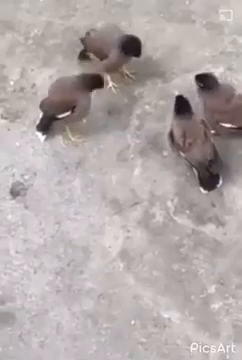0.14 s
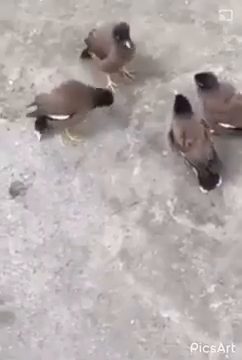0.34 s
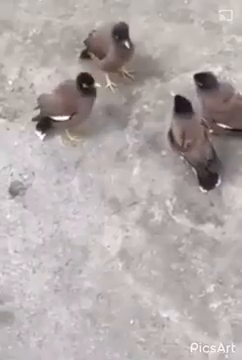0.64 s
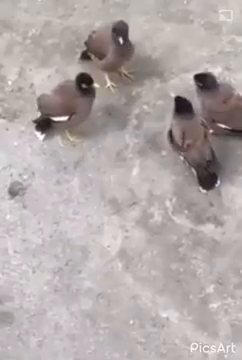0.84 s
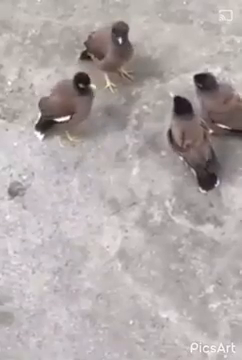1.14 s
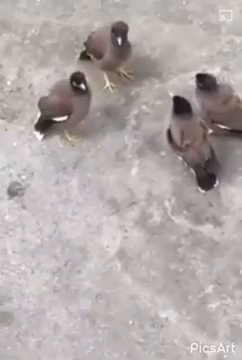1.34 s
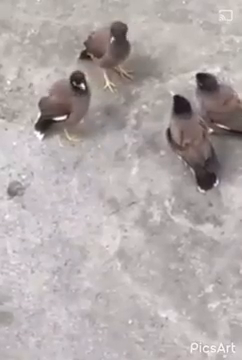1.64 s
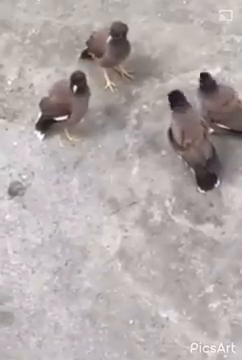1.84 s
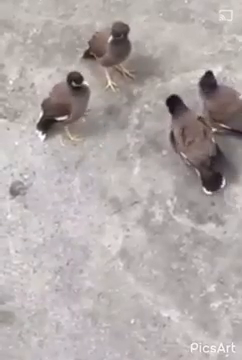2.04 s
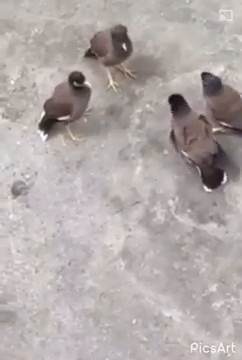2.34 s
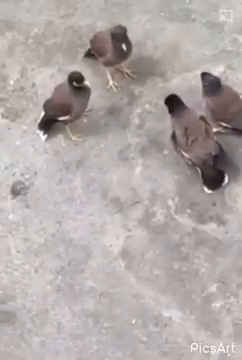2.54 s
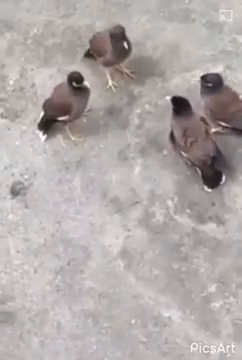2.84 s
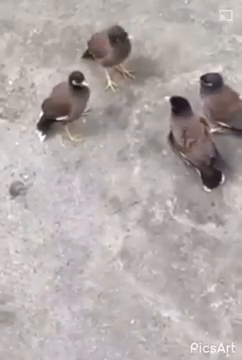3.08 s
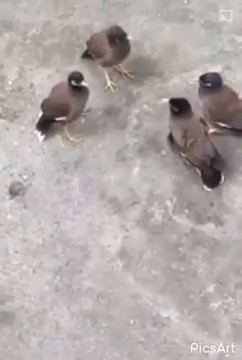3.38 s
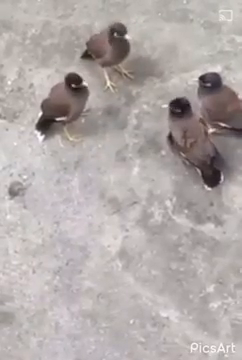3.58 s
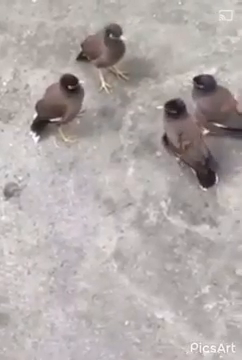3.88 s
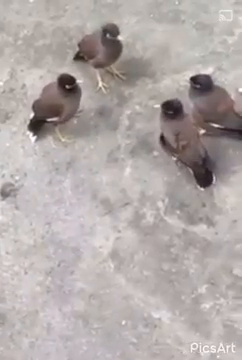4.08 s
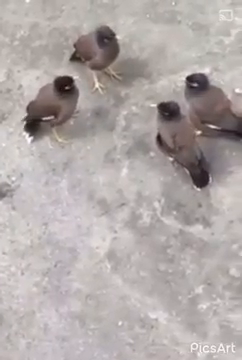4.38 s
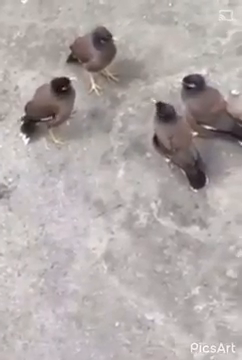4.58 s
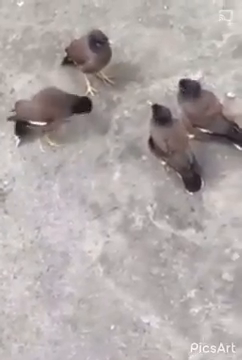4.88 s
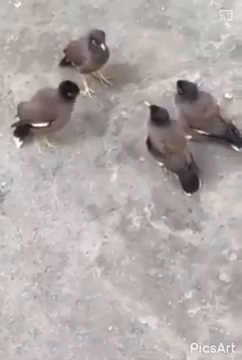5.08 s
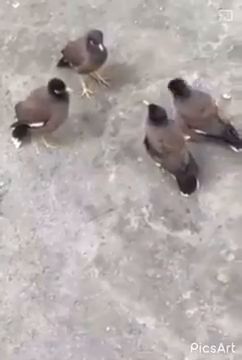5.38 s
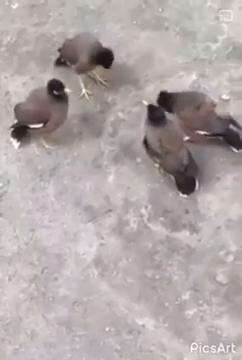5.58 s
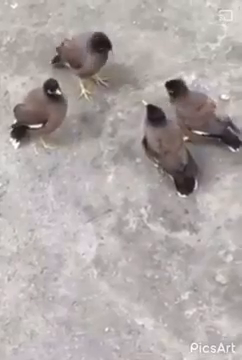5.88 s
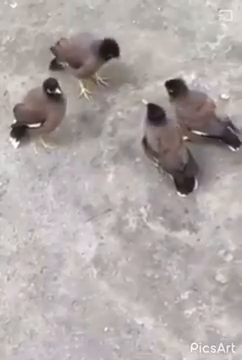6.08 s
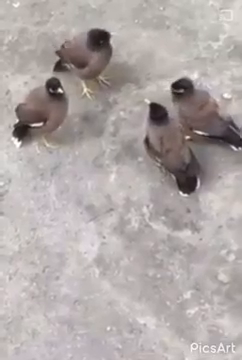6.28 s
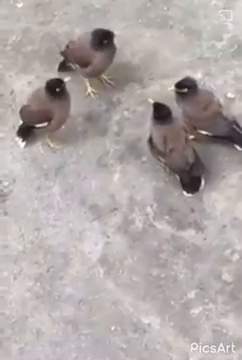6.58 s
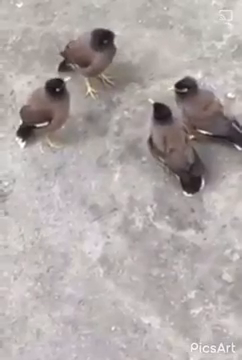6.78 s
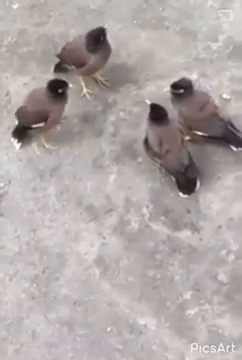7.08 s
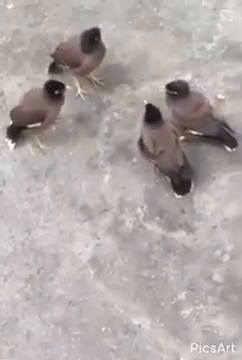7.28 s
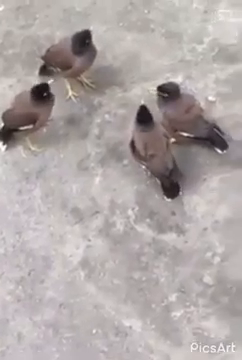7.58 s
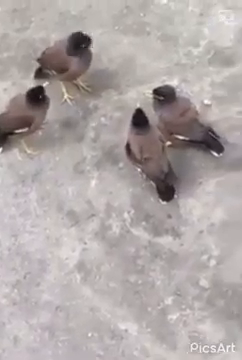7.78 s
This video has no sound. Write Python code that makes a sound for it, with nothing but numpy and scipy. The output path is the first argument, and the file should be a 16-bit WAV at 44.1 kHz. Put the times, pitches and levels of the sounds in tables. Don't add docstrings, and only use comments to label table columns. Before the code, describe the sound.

After a tiny silence, a harsh bright myna rasp with a beak tick bursts in at 0.1 s over faint traffic rumble and low wind buffeting. Softer mutters and low churrs follow until a thin high flute note at 1.15 s. From 1.3 to 3.2 s near scolds come about every quarter second, opened by falling chirps and mixed with arched whistles and quick slides, strongest around 2.5-3 s. Hooked cries fall at 3.2 s; a very high, sharp squeal and rasp strike at 3.4-3.6 s. Mutters and churrs fill the lull to 4.5 s. Three rapid beak ticks at 4.6 s lead to scolds and nasal pips until 5.6 s, wind thumping underneath. Low mellow flute notes run from 5.2 to 7 s, with clear drooping whistles at 6.1-7.1 s. Two pips with rasps, at 7.3 and 7.6 s, close it. Close, mono, short hard-yard echoes, dull above 8 kHz.

```python
import sys
import numpy as np
from scipy import signal
from scipy.fft import rfft, irfft, dct
from scipy.io import wavfile
from scipy.ndimage import uniform_filter1d

SR = 44100
rng = np.random.default_rng(int(sys.argv[2]) if len(sys.argv) > 2 else 0)


def elevation(decibels):
    levels = np.asarray(decibels, float)
    return 10 ** (levels / 20)


def master(y):
    cut = np.clip(np.atleast_2d(y).T, -1, 1)
    pcm = np.round(cut * 32767)
    wavfile.write(sys.argv[1], SR, pcm.astype(np.int16))


N = 349713

# [f/Hz, level/dB per Hz]
TOWN_SPECTRUM = [(12, -27.5), (20, 0.5), (206, -4), (455, -11), (867, -15.5), (958, -17), (1500, -16.5),
                 (1920, -16), (2400, -17.5), (3070, -26.5), (3560, -30.5), (6150, -19), (7900, -29),
                 (9750, -74.5), (16500, -120)]
TOWN_DB, HUM_HZ, HUM_DB = -36.5, 866, -56.5
# [t/s, level/dB]
WIND_GUSTS = [(0.1, -44.5), (0.27, -35.5), (0.84, -50), (0.97, -37.5), (3.39, -47), (3.59, -35.5),
              (4.39, -50), (4.57, -28.5), (4.74, -59.5), (5.03, -27), (5.18, -50), (5.33, -38.5),
              (5.86, -44.5), (6.29, -35), (6.58, -48.5), (7.73, -49), (7.82, -30), (7.93, -56)]

# [crest t/s, hold t/s, beak level/dB, chest level/dB]
NEAR_SCOLDS = [(0.1, 0.11, -19, -32.5), (1.325, 0.018, -21, -28), (1.5, 0.074, -22, -27.5),
               (1.755, 0.051, -24, -26), (1.98, 0.043, -23, -26), (2.275, 0.0038, -20.5, -23.5),
               (2.505, .02, -20, -23.5), (2.735, 0.029, -17.5, -21.5), (2.97, 0.029, -12, -21.5),
               (3.17, 0.013, -21, -22), (3.49, 0.088, -21, -32), (4.62, 0.024, -30.5, -43.5),
               (4.83, 0.059, -25.5, -34.5), (5.175, 0.01, -17.5, -29), (5.39, 0.017, -20.5, -26.5),
               (5.625, 0.015, -22, -34.5), (7.33, 0.0085, -25, -25.5), (7.58, 0.055, -29.5, -32)]
SCOLD_RISE_DB_S, SCOLD_BEAK_FALL_DB_S, SCOLD_CHEST_FALL_DB_S = 420, 155.5, 119
# [crest t/s, hold t/s, beak level/dB, chest level/dB]
FAR_MUTTERS = [(0.46, 0.0065, -41, -41), (0.66, 0.012, -31, -39.5), (0.92, 0.0067, -31, -38.5),
               (1.16, 0.053, -30.5, -31.5), (2.06, 0.027, -28, -36), (2.58, 0.014, -27, -26.5),
               (3.08, .04, -26.5, -27), (3.4, 0.03, -39.5, -34), (3.76, .02, -33, -31),
               (3.88, 0.023, -43.5, -35.5), (4.09, 0.1, -36, -37), (4.42, 0.014, -36.5, -34.5),
               (5.08, 0.027, -36.5, -35), (5.3, 0.06, -29.5, -38.5), (6.08, 0.035, -32.5, -44.5),
               (6.27, 0.05, -30.5, -42), (6.56, 0.18, -32, -35), (6.8, 0.042, -35, -33.5),
               (7.07, 0.04, -28, -29.5), (7.42, 0.017, -33, -39.5), (7.68, 0.071, -36.5, -38)]
MUTTER_RISE_DB_S, MUTTER_BEAK_FALL_DB_S, MUTTER_CHEST_FALL_DB_S = 159.5, 133, 133
# [crest t/s, hold t/s, level/dB]
LOW_CHURRS = [(0.216, 0.016, -29.5), (0.461, 0.017, -31), (0.654, 0.027, -27.5), (0.922, .03, -27),
              (1.124, 0.042, -29.5), (1.305, .01, -26.5), (1.527, .03, -35.5), (1.867, 0.018, -49),
              (2.013, 0.0092, -40.5), (2.539, 0.024, -32), (2.976, .02, -37.5), (3.088, 0.022, -31.5),
              (3.222, 0.014, -32), (3.414, .02, -30.5), (3.758, .06, -30.5), (4.068, .04, -30.5),
              (4.284, 0.036, -35.5), (4.421, 0.018, -28), (4.614, 0.01, -31.5), (5.087, 0.022, -36),
              (5.19, .01, -33), (5.365, 0.17, -32.5), (5.92, 0.033, -34), (6.274, 0.17, -45.5),
              (6.798, .03, -35.5), (7.099, 0.03, -31.5), (7.334, .03, -40), (7.659, 0.073, -37)]
CHURR_RISE_DB_S, CHURR_FALL_DB_S = 188, 189
# [f/Hz, width f/Hz, level/dB]
BEAK_MODES = [(4098, 1500, -8.5), (5000, 1100, -6), (6140, 870, 4), (7860, 1000, 1)]
# [f/Hz, width f/Hz, level/dB]
CHEST_MODES = [(2400, 670, 0.97), (3099, 610, -2.4)]
# [f/Hz, width f/Hz, level/dB]
CHURR_MODES = [(1238, 380, -7), (1635, 380, -4.5)]

# [t/s, peak level/dB]
BEAK_TICKS = [(0.1055, -9), (0.467, -23.5), (1.9483, -15), (2.237, -16.5), (2.4723, -13), (3.4415, -21.5),
              (4.5824, -13), (4.6105, -10.5), (4.6408, -12), (4.815, -18.5), (5.159, -9.5), (5.6084, -12.5),
              (5.904, -22), (5.9491, -17.5), (6.028, -27), (6.0619, -22), (6.2521, -11.5), (6.432, -15.5),
              (7.5193, -38), (7.543, -56)]

# [t/s, length t/s, from f/Hz, to f/Hz, level/dB]
FLUTE_NOTES = [
    (5.19, 0.21, 1327, 1530, -37.5),
    (5.68, .12, 1456, 1420, -39.5),
    (5.85, .1, 1535, 1526, -36.5),
    (6.06, 0.073, 1420, 1469, -37),
    (6.2, .11, 1520, 1490, -37),
    (6.48, .18, 1421, 1502, -39),
    (7.0, 0.065, 1435, 1408, -40),
    (1.15, .15, 2360, 2363, -36.5),
]
# [t/s, length t/s, from f/Hz, to f/Hz, level/dB]
FALLING_CHIRPS = [
    (1.29, 0.057, 2440, 2130, -35),
    (1.515, 0.049, 2290, 1950, -33),
    (1.72, 0.055, 2468, 1760, -23),
    (1.953, 0.052, 2390, 1783, -24.5),
    (2.24, .05, 2500, 1739, -24.5),
    (2.48, .05, 2468, 1800, -20),
    (2.71, 0.044, 2317, 1920, -22),
    (2.96, 0.045, 2280, 1683, -22.5),
]
# [multiple, loudest at share of chirp, level/dB, swell level/dB]
CHIRP_THROAT = [
    (1, 0.054, -6.5, 42.5),
    (2, 0.76, -1.5, 61.5),
    (3, 0.67, -1, 112),
]
# [t/s, length t/s, crest f/Hz, level/dB, closing fall 0-1]
ARCHED_WHISTLES = [
    (1.4, 0.13, 2800, -28, 0.13),
    (2.025, 0.12, 2780, -27, 0.06),
    (2.54, 0.16, 2780, -30, 0),
    (6.1, 0.15, 2752, -29, 0.2),
    (6.495, .17, 2785, -28, 0.13),
    (6.862, 0.17, 2770, -26.5, .17),
    (7.03, 0.11, 2820, -30, 0.09),
]
WHISTLE_OCTAVE_DB, PIP_OCTAVE_DB = -3, -4
# [t/s, length t/s, from f/Hz, to f/Hz, level/dB]
STRAIGHT_SLIDES = [(1.785, 0.042, 2327, 3170, -30.5), (2.02, 0.033, 2356, 3230, -28.5),
                   (2.14, 0.074, 2813, 1996, -32.5), (6.22, .06, 2650, 1974, -37.5),
                   (6.66, 0.092, 2800, 2820, -36), (2.33, 0.063, 3396, 3315, -33.5),
                   (2.54, 0.031, 1948, 1515, -26), (2.7, 0.12, 2660, 1920, -32.5),
                   (2.975, .07, 5000, 4514, -22), (3.04, .08, 3195, 3300, -29.5),
                   (3.1, .09, 3283, 3440, -28), (3.18, 0.087, 3460, 3530, -37),
                   (3.095, 0.043, 2035, 1398, -30), (3.21, 0.037, 1840, 1183, -31),
                   (3.2, .06, 2983, 2008, -31), (3.02, .02, 2710, 3150, -27.5),
                   (3.4, 0.012, 4220, 5840, -50), (3.411, .021, 3960, 6580, -18),
                   (3.49, .05, 6464, 3860, -35.5), (3.57, 0.051, 1860, 1385, -39),
                   (3.62, .035, 6000, 4970, -29), (4.812, 0.019, 6030, 2400, -34.5),
                   (7.145, 0.046, 2930, 2440, -36)]
# [t/s, length t/s, from f/Hz, to f/Hz, level/dB]
CLOSING_HOOKS = [
    (6.27, .12, 2000, 1740, -36),
    (6.67, .11, 2044, 1716, -33),
    (7.05, .09, 1863, 1711, -31),
    (7.23, .07, 2110, 1990, -40.5),
    (3.17, .035, 3430, 2277, -22.5),
    (3.478, .062, 6360, 2840, -24),
]
# [t/s, length t/s, crest f/Hz, level/dB, closing fall 0-1]
NASAL_PIPS = [
    (4.825, 0.049, 3153, -29, 0.031),
    (5.045, .085, 3065, -32.5, 0.15),
    (5.29, .085, 3093, -29.5, .2),
    (7.315, .048, 2993, -26, 0.037),
    (7.57, .045, 3005, -26, 0.016),
]
# [multiple, level/dB]
PIP_STACK = [
    (.5, -10),
    (1.5, -9),
]

# [t/s, level/dB]
NEAR_ECHOES = [
    (0.009, -13),
    (.027, -19),
]
YARD_DB, YARD_T60_S = -10, .45
SHARP_ATTACKS = [.11, 1.96, 2.24, 2.96, 3.43, 3.47, 4.6, 4.82, 5.16, 5.61, 6.25]
START_S, CUTOFF_HZ = .098, 8050


def rms_one(x):
    return x / np.sqrt(np.mean(x ** 2) + 1e-20)


def drift(rate_hz):
    r = np.exp(-2 * np.pi * rate_hz / SR)
    settled = signal.lfilter([1], [1, -2 * r, r * r], rng.standard_normal(N + SR))[SR:]
    return rms_one(settled)


def town():
    t = np.arange(N) / SR
    hz = np.maximum(np.fft.rfftfreq(N, 1 / SR), 1)
    colour_hz, colour_db = np.transpose(TOWN_SPECTRUM)
    colour = elevation(np.interp(np.log(hz), np.log(colour_hz), colour_db))
    far = rms_one(irfft(rfft(rng.standard_normal(N)) * colour, N))
    far = far * elevation(TOWN_DB + 1.1 * drift(5.6))
    hum = elevation(HUM_DB + 1.7 * drift(7.8)) * np.sin(2 * np.pi * HUM_HZ * t)
    gust_band = signal.butter(2, [20, 70], "band", fs=SR, output="sos")
    gusts = rms_one(signal.sosfilt(gust_band, rng.standard_normal(N)))
    wind_s, wind_db = np.transpose(WIND_GUSTS)
    return far + hum + elevation(np.interp(t, wind_s, wind_db) + 0.5) * gusts


def throat(x, modes):
    out = 0
    for k, (hz, width_hz, db) in enumerate(modes):
        r = np.exp(-np.pi * width_hz / SR)
        b = [(1 - r * r) / 2, 0, (r * r - 1) / 2]
        a = [1, -2 * r * np.cos(2 * np.pi * hz / SR), r * r]
        ringing = signal.lfilter(b, a, signal.lfilter(b, a, x))
        out = out + (-1) ** k * elevation(db) * ringing
    return rms_one(out)


def flaps(rate_hz, jitter, spread_db, breath):
    turns = np.cumsum(rate_hz * np.exp(jitter * drift(150)) / SR)
    slap = np.diff(np.floor(turns), prepend=0) * elevation(spread_db * rng.uniform(-1, 1, N))
    puff = rng.standard_normal(N) * (.3 + np.exp(-3.0 * (turns % 1)))
    return rms_one(slap) + breath * rms_one(puff)


def streaks(rate_hz, high_hz, low_hz, fall_s):
    t = np.arange(round(fall_s * SR)) / SR
    glide = signal.chirp(t, high_hz, fall_s, low_hz, method="logarithmic") * np.hanning(len(t))
    return signal.fftconvolve(flaps(rate_hz, jitter=.5, spread_db=6, breath=0), glide)[:N]


def swells(s, hold_s, db, rise_db_s, fall_db_s):
    t = np.arange(0, N, 32) / SR
    s, hold_s, db = s[:, None], hold_s[:, None], db[:, None]
    climb_db = rise_db_s * np.maximum(s - t, 0)
    decay_db = fall_db_s * np.maximum(t - s - hold_s, 0)
    gain = np.sqrt(np.sum(elevation(2 * (db - climb_db - decay_db)), axis=0))
    return np.interp(np.arange(N) / SR, t, gain)


def rasps():
    beak, chest = 0, 0
    for rows, rise, beak_fall, chest_fall in [
            (NEAR_SCOLDS, SCOLD_RISE_DB_S, SCOLD_BEAK_FALL_DB_S, SCOLD_CHEST_FALL_DB_S),
            (FAR_MUTTERS, MUTTER_RISE_DB_S, MUTTER_BEAK_FALL_DB_S, MUTTER_CHEST_FALL_DB_S)]:
        s, hold_s, beak_db, chest_db = np.transpose(rows)
        beak = np.hypot(beak, swells(s, hold_s, beak_db, rise, beak_fall))
        chest = np.hypot(chest, swells(s, hold_s, chest_db, rise, chest_fall))
    harsh = rms_one(flaps(330, jitter=.35, spread_db=7.5, breath=1.2))
    harsh = harsh + elevation(-5) * rms_one(streaks(70, high_hz=7600, low_hz=1900, fall_s=.07))
    low = flaps(190, jitter=.3, spread_db=3.5, breath=.9)
    flutter = elevation(1.6 * drift(40))
    bright = beak * throat(harsh, BEAK_MODES) + chest * throat(harsh, CHEST_MODES)
    churr = swells(*np.transpose(LOW_CHURRS), CHURR_RISE_DB_S, CHURR_FALL_DB_S)
    return elevation(-6.0) * (flutter * bright + churr * throat(low, CHURR_MODES))


def ticks():
    clicks = np.full(N, 1e-18)
    for s, db in BEAK_TICKS:
        clicks[round(s * SR)] = elevation(db - 5.5)
    snap = signal.lfilter([1], [1, -np.exp(-1 / (.002 * SR))], clicks)
    release = signal.lfilter([1], [1, -np.exp(-1 / (0.023 * SR))], clicks)
    burst = snap + elevation(-12.5) * release
    return burst * throat(rng.standard_normal(N), BEAK_MODES + CHEST_MODES) / 2


def sing(notes, wobble, flutter_db, edge_s):
    out = np.zeros(N)
    shake = 1 + wobble * drift(120)
    tremble = elevation(flutter_db * drift(60))
    for rows in notes:
        s, hz, *levels = np.transpose(rows)
        at = np.arange(int(s[0] * SR), int(s[-1] * SR))
        t = at / SR
        phase = 2 * np.pi * np.cumsum(np.interp(t, s, hz) * shake[at]) / SR
        ends = np.clip(np.minimum(t - s[0], s[-1] - t) / edge_s, 0, 1)
        for k, db in enumerate(levels):
            gain = np.sqrt(2) * elevation(np.interp(t, s, db)) * ends * tremble[at]
            out[at] += gain * np.sin((k + 1) * phase)
    return out


def glides(notes, crest, swell_db, haste=0.011, multiple=1, gain_db=0):
    share = np.linspace(0, 1, 24)
    way = (1 - np.exp(-haste * share)) / (1 - np.exp(-haste))
    out = []
    for s, length, from_hz, to_hz, db in notes:
        hz = multiple * from_hz * (to_hz / from_hz) ** way
        level_db = db + gain_db - swell_db * (share - crest) ** 2
        out.append(np.c_[s + length * share, hz, level_db])
    return out


def flutes():
    return sing(glides(FLUTE_NOTES, crest=0.53, swell_db=12), 0.008, 1.7, edge_s=0.0091)


def chirps():
    notes = []
    for multiple, crest, gain_db, swell_db in CHIRP_THROAT:
        notes += glides(FALLING_CHIRPS, crest, swell_db, haste=-1.5, multiple=multiple, gain_db=gain_db)
    return sing(notes, .012, 3.2, edge_s=0.0031)


def arched(notes, second_db, scoop, scoop_s, fall_s):
    out = []
    for s, length, crest_hz, db, fall in notes:
        t = np.linspace(0, length, 40)
        rising, sagging = np.exp(-t / scoop_s), np.exp((t - length) / fall_s)
        hz = crest_hz * (1 - scoop * rising - fall * sagging)
        level_db = db - 6.1 * rising - 16.0 * sagging
        octave_db = level_db + second_db - 14.0 * (rising + sagging)
        out.append(np.c_[s + t, hz, level_db, octave_db])
    return out


def whistles():
    notes = arched(ARCHED_WHISTLES, WHISTLE_OCTAVE_DB, scoop=0.17, scoop_s=.019, fall_s=.018)
    return sing(notes, 0.0045, 1.9, edge_s=0.0054)


def slides():
    notes = glides(STRAIGHT_SLIDES, crest=0.49, swell_db=33)
    notes += glides(CLOSING_HOOKS, crest=0.37, swell_db=35.5, haste=2.5)
    return sing(notes, .012, 3.2, edge_s=0.0031)


def pips():
    notes = arched(NASAL_PIPS, PIP_OCTAVE_DB, scoop=0.15, scoop_s=0.01, fall_s=0.0098)
    out = sing(notes, 0.0032, 2.0, edge_s=0.0032)
    for multiple, db in PIP_STACK:
        partial = [rows[:, :3] * [1, multiple, 1] + [0, 0, db] for rows in notes]
        out += sing(partial, 0.0033, 1.5, edge_s=0.0055)
    return out


def yard(x):
    t = np.arange(SR // 2) / SR
    reply = rng.standard_normal(len(t)) * elevation(-60 * t / YARD_T60_S) * np.clip(t / .02, 0, 1)
    reply = elevation(YARD_DB) * reply / np.sqrt(np.sum(reply ** 2))
    reply[0] = 1
    for s, db in NEAR_ECHOES:
        reply[round(s * SR)] += elevation(db)
    return signal.fftconvolve(x, reply)[:N]


def scene():
    birds = rasps() + ticks() + flutes() + chirps() + whistles() + slides() + pips()
    return np.tile(yard(birds) + town(), (2, 1))


def thin_spectrum(x, size, near_db, wide_db):
    pad = size - 128 % size
    window = signal.windows.kaiser_bessel_derived(2 * size, 4 * np.pi)
    padded = np.r_[np.zeros(pad), x, np.zeros(2 * size)]
    at = size * np.arange(len(padded) // size - 1)[:, None] + np.arange(2 * size)
    a, b, c, d = np.split(padded[at] * window, 4, axis=1)
    lines = dct(np.c_[-c[:, ::-1] - d, a - b[:, ::-1]], type=4, norm="ortho")
    near = uniform_filter1d(lines ** 2, size=size // 80, axis=1)
    wide = uniform_filter1d(np.abs(lines), size=size // 7, axis=1) ** 2
    hz = np.arange(size) * SR / 2 / size
    whim = uniform_filter1d(rng.standard_normal((len(at), 128)), size=3, axis=0)
    whim = whim.repeat(size // 128, axis=1)
    trim_db = np.interp(hz, [100, 600, 1500, 6500, 8000], [-7, 1, 2, 3, 6]) + 10 * whim * (hz > 900)
    wide_share = np.interp(hz, [900, 3000], [0, 1])
    masking = elevation(2 * near_db) * near + elevation(2 * wide_db) * wide * wide_share
    step = elevation(trim_db) * np.sqrt(masking + 1e-9)
    steps = np.floor((np.abs(lines) / step) ** .75 + .4) ** (4 / 3)
    u, v = np.split(dct(np.sign(lines) * steps * step, type=4, norm="ortho"), 2, axis=1)
    out = np.zeros(len(padded))
    np.add.at(out, at, np.c_[v, -v[:, ::-1], -u[:, ::-1], -u] * window)
    return out[pad:pad + N]


def top_cut(x):
    return signal.sosfilt(signal.butter(12, 8050, fs=SR, output="sos"), x)


def record(dry):
    sharp = np.zeros(N)
    sharp[[round(s * SR) for s in SHARP_ATTACKS]] = 1
    short = uniform_filter1d(uniform_filter1d(sharp, size=2048), size=512) * 2048
    short = np.clip(short, 0, 1)
    quick = thin_spectrum(dry[0], size=256, near_db=-4, wide_db=-5)
    slow = thin_spectrum(dry[0], size=2048, near_db=0.5, wide_db=4)
    x = short * quick + (1 - short) * slow
    x = signal.sosfilt(signal.cheby2(16, 60, CUTOFF_HZ + 150, fs=SR, output="sos"), x)
    x = .8 * np.tanh(x / .8)
    x = x * np.clip((np.arange(N) / SR - START_S) / .001, 0, 1)
    return top_cut(np.tile(x, (2, 1)))


dry = scene()
out = record(dry)
master(out)
```